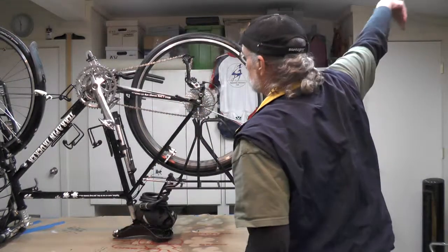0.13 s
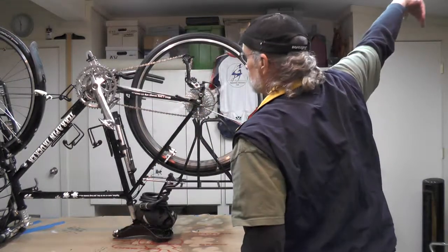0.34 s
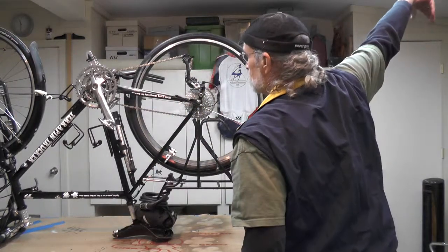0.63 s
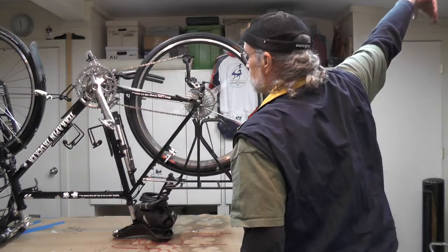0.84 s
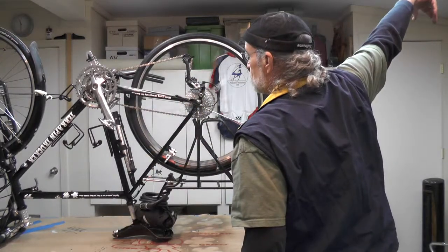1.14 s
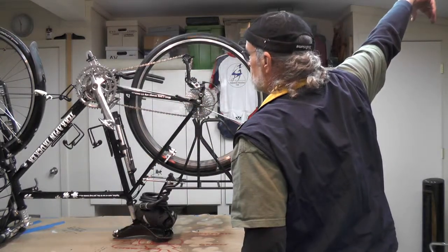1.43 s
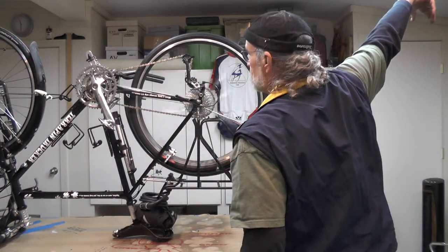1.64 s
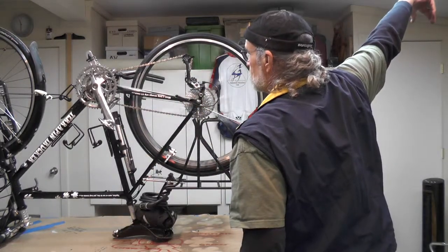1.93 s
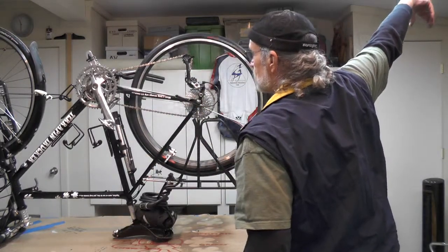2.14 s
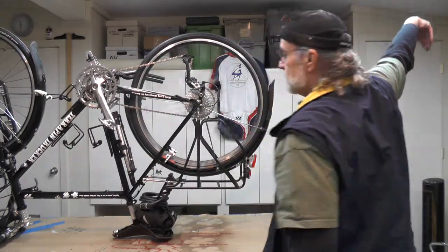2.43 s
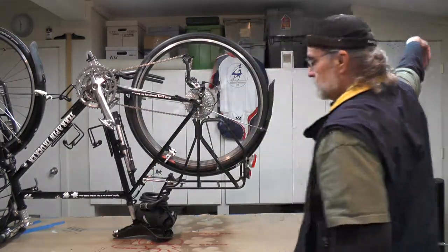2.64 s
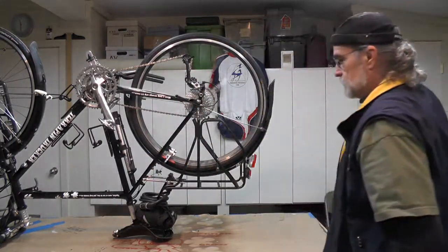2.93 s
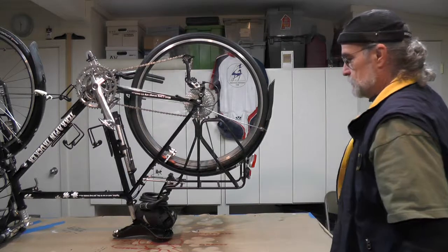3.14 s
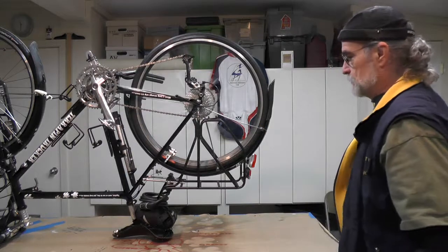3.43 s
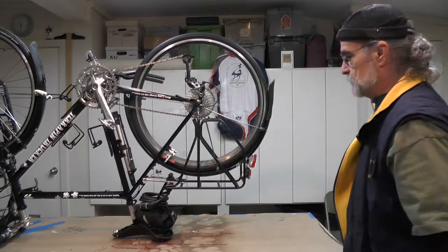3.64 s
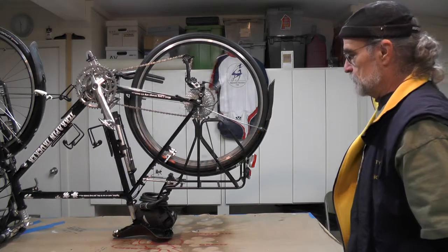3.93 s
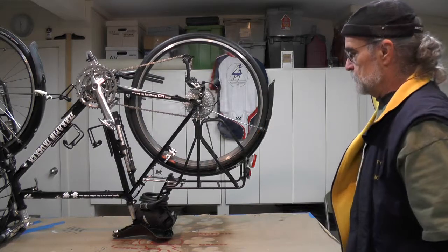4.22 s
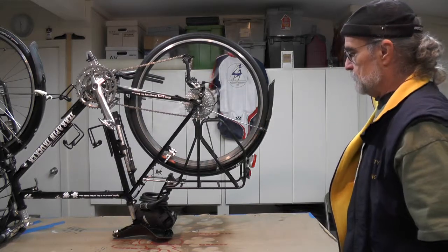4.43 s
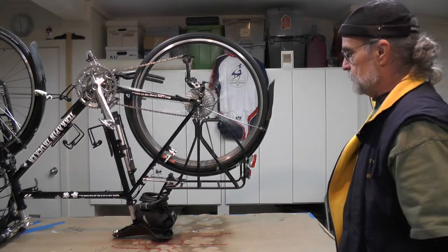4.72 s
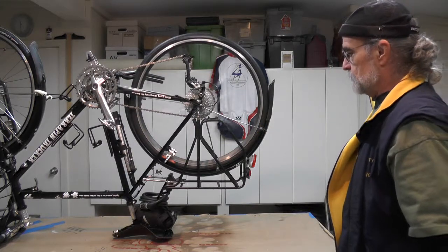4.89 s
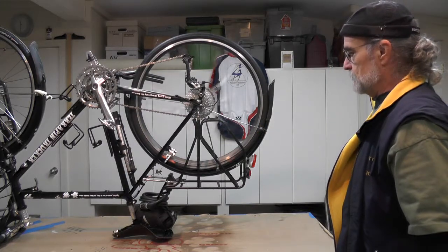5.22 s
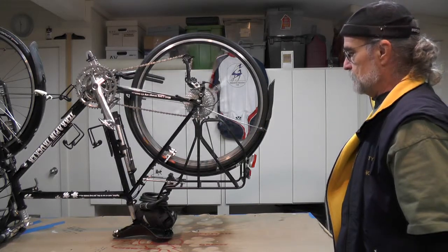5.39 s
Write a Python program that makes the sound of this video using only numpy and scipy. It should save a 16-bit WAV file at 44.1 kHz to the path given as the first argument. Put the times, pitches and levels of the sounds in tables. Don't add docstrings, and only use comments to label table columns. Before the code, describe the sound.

A close stereo pickup of a freewheel already spinning: dense, dry, high ticking with metallic ring from spokes and hub, pulsing subtly with each turn and slowing a little. The fading trace of the push lies under the start. A hard knock cuts through around the middle, followed by a small gritty scuff and later a dull thump. Lively workshop room over a quiet low hum-like noise floor.

```python
import sys
import numpy as np
from scipy import signal
from scipy.fft import rfft, irfft, next_fast_len
from scipy.io import wavfile

SR = 44100
rng = np.random.default_rng(int(sys.argv[2]) if len(sys.argv) > 2 else 0)


def voltage_ratio(level):
    return 10 ** (np.asarray(level, float) / 20)


def master_out(mix):
    frames = np.transpose(np.atleast_2d(mix))
    ceiling = np.clip(frames, -1, 1)
    pcm = np.round(ceiling * 32767).astype(np.int16)
    wavfile.write(sys.argv[1], SR, pcm)


N = 244755
SIZE = next_fast_len(N + SR)
HZ = np.fft.rfftfreq(SIZE, 1 / SR)

# hz, density_db
FLOOR_MID = [(13, -37), (22, -6), (43, -10), (75, 1.5), (162, -5.5), (248, -3.5), (297, -7), (356, -5),
             (380, -8), (696, -6.5), (833, -9), (981, -13), (1100, -15), (1430, -32), (2420, -120)]
FLOOR_SIDE = [(15, -39), (25, -9), (48, -6), (158, 2.5), (384, 3), (682, 0.5), (917, -4), (1150, -5),
              (1600, -9), (2080, -39), (3520, -120)]
FLOOR_MID_DB, FLOOR_SIDE_DB = -54.5, -58

# hz, t60_s
ROOM_DECAY = [(100, 0.76), (1000, 0.69), (3000, 0.69), (8000, 0.34), (16000, 0.44)]
# hz, level_db
DIFFUSE_WIDTH = [(100, -14), (400, -14), (1200, -13.5), (2000, -24), (3000, -16.5), (5500, -22.5),
                 (7200, -26), (8600, -8), (10000, -29), (13000, -24)]

# level_db, centre_hz, width_hz, t60_s
PUSH_REMNANT = (-40, 600, 1600, 1.1)

# start_s, level_db, centre_hz, width_hz, length_ms
FOOTFALLS = [
    (2.5469, -14, 2100, 2600, .1),
    (2.548, -41, 500, 900, 10),
    (3.255, -46, 350, 180, 22),
    (3.29, -41.5, 370, 220, 12),
    (3.285, -42, 950, 1300, 35),
    (5.125, -48, 160, 250, 12),
]
FOOTFALL_ROOM_DB, FIRST_WALL_MS = -5.5, 2.99

TEETH = 24
# mean_lag_ms, swing_ms, latest_tooth, skew_rad, pointedness (0 to 1)
FIRST_PAWL_LAG = (0.0, .39, 17.2, .35, .6)
SECOND_PAWL_LAG = (1.3, 1.36, 23.6, 0, .97)
# lag_ms, pitch_hz, level_db, t60_ms
FIRST_PAWL_TICK = [(0, 8400, 1.5, 2.2), (0, 10200, -4, 2), (.2, 6900, -17, 4), (0, 14800, -8, 3),
                   (.6, 12900, -9, 3.5), (.6, 3900, -16, 5), (.5, 2750, -20, 9)]
SECOND_PAWL_TICK = [(0, 12700, -6, 2), (0, 14700, -6, 1.7), (0, 7800, -12, 2), (0, 10500, -12, 2),
                    (0, 3900, -10, 5), (0, 5000, -12, 3), (.1, 2750, -12, 10), (.55, 13200, -14, 2)]

# hz, level_db
WHEEL_COLOUR = [(530, -59), (900, -34), (1090, -21), (1210, -17), (2100, -11), (2400, -6), (2860, -3),
                (5630, -7), (8340, -2), (10000, -8), (10800, -13), (12700, -5), (13500, -10),
                (15500, -11.5)]
# pitch_hz, width_hz, level_db
WHEEL_MODES = [(1155, 16, 13), (1345, 30, 3), (2300, 60, 3), (2576, 55, 5), (2705, 40, 8.5),
               (2842, 30, 7), (2940, 25, 6), (3100, 40, 3), (4280, 90, 3), (4790, 50, 3),
               (5600, 80, 3),
               (6735, 100, 8), (7060, 70, 5), (7410, 50, 4), (7800, 90, 5), (8180, 40, 4), (8337, 40, 4),
             (8463, 30, 7), (8650, 60, 5), (9180, 90, 3), (10330, 140, 9), (12670, 60, 3), (14300, 60, 3),
             (15000, 80, 4), (15350, 60, 3)]

# lag_ms, level_db, centre_hz
REFLECTIONS = [(1.3, -12, 12000), (2.78, -10, 12000), (5.75, -5, 7200), (13.6, -14, 8500), (16.2, -6, 2700),
               (18.3, -14, 12000), (21.2, -10, 6800)]
REFLECTION_OCTAVES = .6

START_S, START_TURNS_PER_S = -.004612, 1.567753
BEARING_DRAG, AIR_DRAG = .005205, .0145775
SWELL_DB, LOUDEST_TOOTH = 0.3, 21.3
BUZZ_DB = -29.5

# start_db, time_constant_s
GAIN_RECOVERY = [(-1, 0.13), (-2.52, 4.6)]


def evened(x):
    return x / np.sqrt(np.mean(x ** 2) + 1e-20)


def read(points, hz):
    table_hz, value = np.transpose(points)
    return np.interp(np.log(hz + 1), np.log(table_hz + 1), value)


def band(x, centre_hz, width_hz):
    b, a = signal.iirpeak(centre_hz, centre_hz / width_hz, SR)
    return signal.lfilter(b, a, x)


def causal(gain_db):
    cepstrum = irfft(np.log(voltage_ratio(np.maximum(gain_db, -100))), SIZE)
    cepstrum[1:SIZE // 2] *= 2
    cepstrum[SIZE // 2 + 1:] = 0
    return np.exp(rfft(cepstrum))


def room_floor():
    noise = rfft(rng.standard_normal((2, SIZE)))
    mid = evened(irfft(noise[0] * voltage_ratio(read(FLOOR_MID, HZ)), SIZE)) * voltage_ratio(FLOOR_MID_DB)
    side = evened(irfft(noise[1] * voltage_ratio(read(FLOOR_SIDE, HZ)), SIZE)) * voltage_ratio(FLOOR_SIDE_DB)
    return np.array([mid, side])[:, :N]


def push_remnant():
    level_db, centre_hz, width_hz, t60_s = PUSH_REMNANT
    noise = evened(band(rng.standard_normal((2, N)), centre_hz, width_hz))
    decay = voltage_ratio(level_db - 60 * np.arange(N) / SR / t60_s)
    side_against_mid = voltage_ratio(np.array([[0], [-7.]]))
    return noise * decay * side_against_mid


def diffuse_path(rattle_db, rattle_t60_s=.022):
    noise = rng.standard_normal((2, SR // 2))
    hz, frame_s, z = signal.stft(noise, SR, nperseg=128)
    decay = voltage_ratio(-60 * frame_s / read(ROOM_DECAY, hz)[:, None])
    late = signal.istft(z * decay, SR, nperseg=128)[1][:, :SR // 2]
    t = np.arange(SR // 2) / SR
    rattle = noise * voltage_ratio(rattle_db - 60 * t / rattle_t60_s) * np.clip(t / .0007, 0, 1)
    path = rattle + late * np.clip(t / .012, 0, 1)
    return rfft(path / np.linalg.norm(late[0]), SIZE) * [HZ ** 0, voltage_ratio(read(DIFFUSE_WIDTH, HZ))]


def footfalls():
    near, to_room = np.zeros(SIZE), np.zeros(SIZE)
    for start_s, level_db, centre_hz, width_hz, length_ms in FOOTFALLS:
        u = np.arange(4000) / SR / (length_ms / 1000)
        grit = rng.standard_normal(len(u)) if length_ms > 1 else 1
        push = grit * u * np.exp(-2 * u)
        burst = band(band(push, centre_hz, width_hz), centre_hz, width_hz)
        burst *= -voltage_ratio(level_db) / abs(burst).max()
        near[round(start_s * SR):][:len(u)] += burst
        wall_s = start_s + FIRST_WALL_MS / 1000
        to_room[round(wall_s * SR):][:len(u)] += burst * voltage_ratio(FOOTFALL_ROOM_DB)
    out = irfft(rfft(to_room) * diffuse_path(rattle_db=8.0, rattle_t60_s=0.32), SIZE)
    out[0] += near
    return out[:, :N]


def tooth_times(tooth):
    rest = BEARING_DRAG / AIR_DRAG
    speed = np.sqrt((START_TURNS_PER_S ** 2 + rest) * np.exp(-2 * AIR_DRAG * tooth / TEETH) - rest)
    s = np.cumsum(1 / speed) / TEETH
    return START_S + s - s[tooth == 0]


def pawl_drops(tooth, lag_ms, swing_ms, latest, skew, point, facing_db, tooth_db, chance_db=.4):
    wear = rng.standard_normal((TEETH, 2))[tooth % TEETH]
    luck = rng.standard_normal((len(tooth), 2))
    angle = 2 * np.pi * (tooth - latest) / TEETH
    facing = np.arcsin(point * np.cos(angle + skew * (1 - np.cos(angle)))) / np.arcsin(point)
    late_ms = lag_ms + swing_ms * facing + .05 * wear[:, 0] + .025 * luck[:, 0]
    level_db = facing_db * facing + tooth_db * wear[:, 1] + chance_db * luck[:, 1]
    return late_ms / 1000, level_db


def impulse_train(s, size):
    out, span = np.zeros(SIZE), np.arange(-16, 17)
    place = s * SR + SR // 2
    at = np.round(place).astype(int)[:, None] + span
    clicks = size[:, None] * np.sinc(at - place[:, None]) * np.hanning(len(span))
    np.add.at(out, at, clicks)
    return rfft(out)


def pawl_tick(modes):
    lag_ms, pitch_hz, level_db, t60_ms = np.transpose(modes)[:, :, None]
    ms = np.maximum(np.arange(2000) * 1000 / SR - lag_ms, 0)
    onset = 1 - np.exp(-ms / .05)
    decay = voltage_ratio(level_db - 60 * ms / t60_ms)
    ringing = onset * decay * np.sin(2 * np.pi * pitch_hz * ms / 1000)
    return rfft(ringing.sum(0), SIZE)


def reflections():
    path = 1
    for lag_ms, level_db, centre_hz in REFLECTIONS:
        octaves = np.log2((HZ + 1) / centre_hz)
        gain = voltage_ratio(level_db - 6 * (octaves / REFLECTION_OCTAVES) ** 2)
        path = path + gain * np.exp(-2j * np.pi * HZ * lag_ms / 1000)
    return path


def wheel_response():
    colour_db = read(WHEEL_COLOUR, HZ)
    for pitch_hz, width_hz, level_db in WHEEL_MODES:
        colour_db = colour_db + level_db / (1 + (2 * (HZ - pitch_hz) / width_hz) ** 2)
    return causal(colour_db)


def freewheel(ring_db=-5.0, sectors=12):
    tooth = np.arange(-16, 196)
    s = tooth_times(tooth)
    swell_db = SWELL_DB * np.cos(2 * np.pi * (tooth - LOUDEST_TOOTH) / TEETH)
    lag1, db1 = pawl_drops(tooth, *FIRST_PAWL_LAG, facing_db=.7, tooth_db=.4)
    lag2, db2 = pawl_drops(tooth, *SECOND_PAWL_LAG, facing_db=0, tooth_db=.6)
    first = s + lag1, voltage_ratio(swell_db + db1)
    second = s + lag2, voltage_ratio(swell_db + db2)

    direct = impulse_train(*first) * pawl_tick(FIRST_PAWL_TICK)
    direct = direct + impulse_train(*second) * pawl_tick(SECOND_PAWL_TICK)
    small_hub_db = read([(1100, -19.0), (1900, -16.5), (2500, -5.5)], HZ)
    direct = direct * reflections() * causal(small_hub_db)

    when, size = np.concatenate([first, second], 1)
    angle = np.concatenate([tooth, tooth + TEETH / 2]) / TEETH
    diffuse = 0
    for k in range(sectors):
        away = (angle * sectors - k + sectors / 2) % sectors - sectors / 2
        share = np.cos(np.pi / 2 * np.clip(away, -1, 1))
        diffuse = diffuse + impulse_train(when, size * share) * diffuse_path(rattle_db=7.)

    ringing = irfft(diffuse * wheel_response(), SIZE)[:, SR // 2:][:, :N]
    both = evened(ringing) * np.sqrt(2) * voltage_ratio(ring_db)
    both[0] -= evened(irfft(direct, SIZE)[SR // 2:][:N]) * voltage_ratio(-3.4)
    return both * voltage_ratio(BUZZ_DB)


def scene():
    mid, side = room_floor() + push_remnant() + footfalls() + freewheel()
    return np.array([mid + side, mid - side])


def top_cut(x):
    return signal.sosfilt(signal.butter(12, 16850, fs=SR, output="sos"), x)


def record(dry):
    t = np.arange(N) / SR
    gain = voltage_ratio(sum(start_db * np.exp(-t / time_s) for start_db, time_s in GAIN_RECOVERY))
    low_pass = signal.firwin(801, 15770, window=("kaiser", 10), fs=SR)
    mix = signal.oaconvolve(dry * gain, low_pass[None], "same")
    return top_cut(mix)


dry = scene()
out = record(dry)
master_out(out)
```